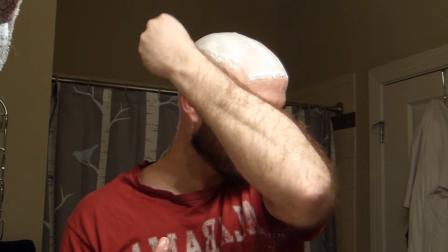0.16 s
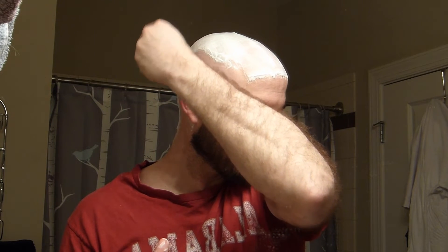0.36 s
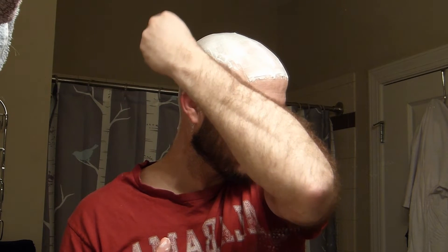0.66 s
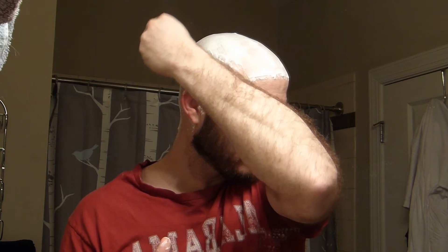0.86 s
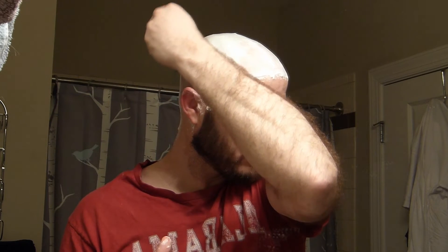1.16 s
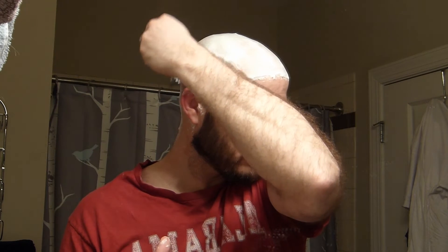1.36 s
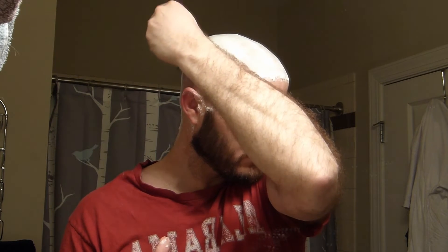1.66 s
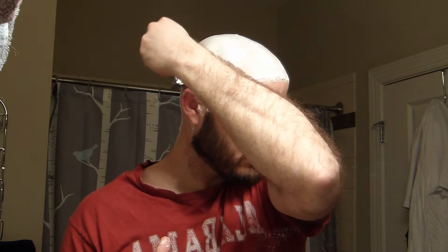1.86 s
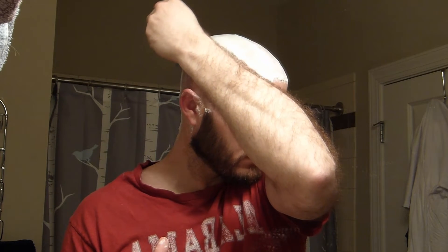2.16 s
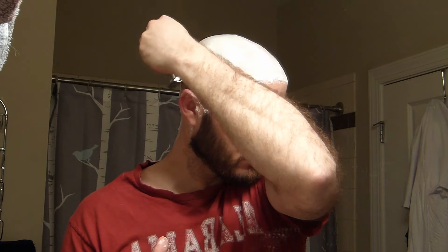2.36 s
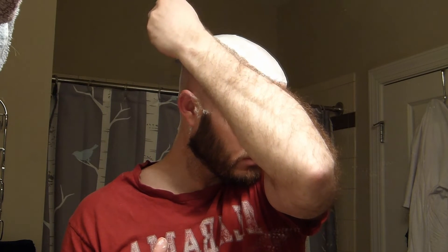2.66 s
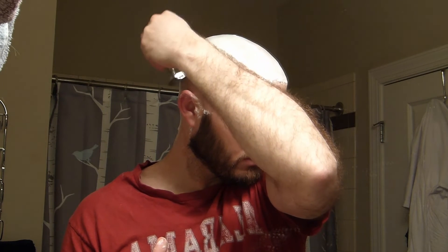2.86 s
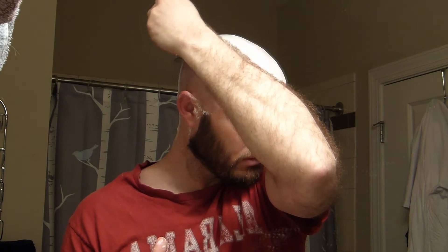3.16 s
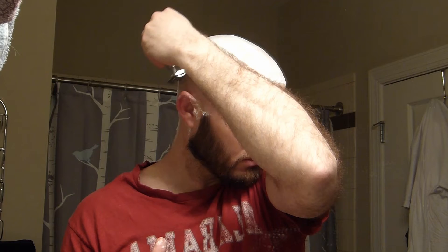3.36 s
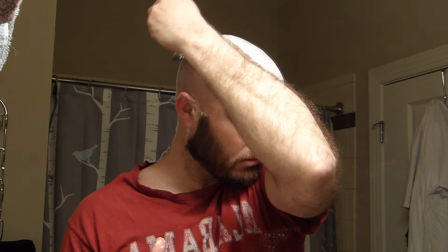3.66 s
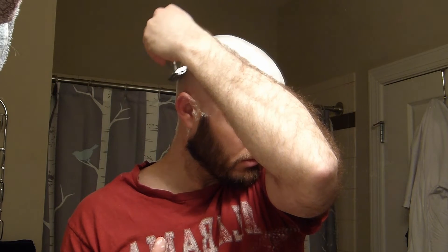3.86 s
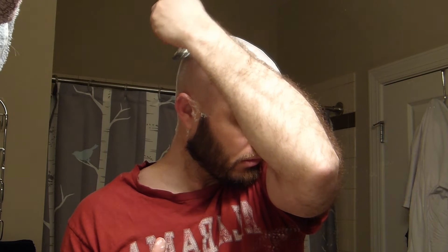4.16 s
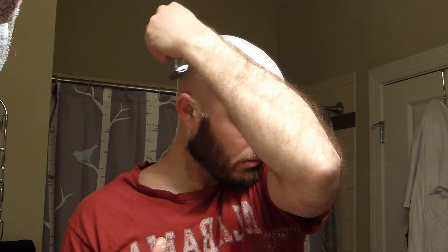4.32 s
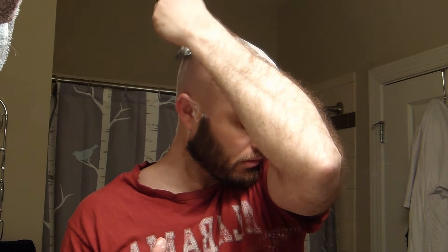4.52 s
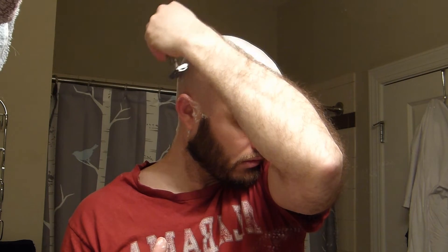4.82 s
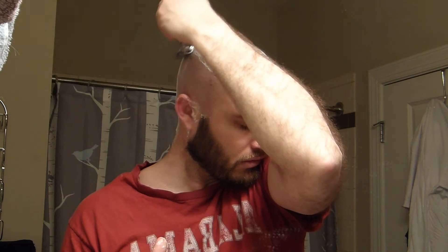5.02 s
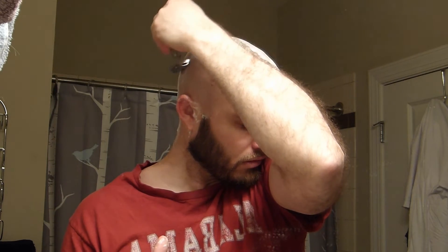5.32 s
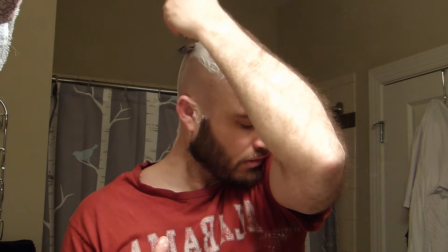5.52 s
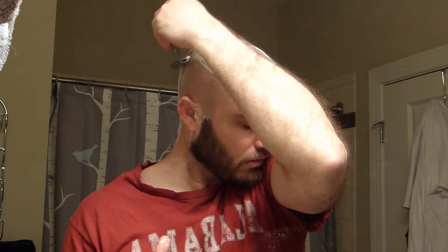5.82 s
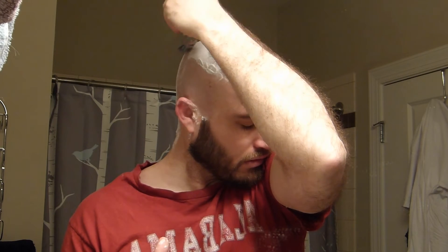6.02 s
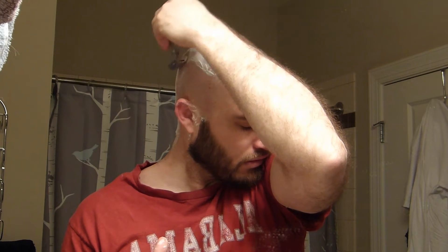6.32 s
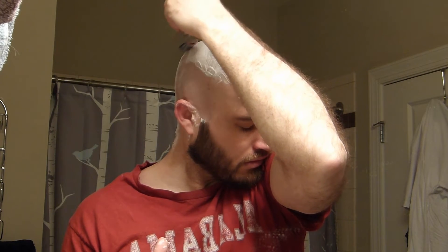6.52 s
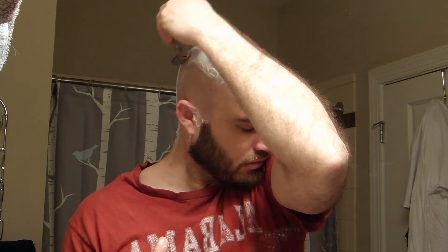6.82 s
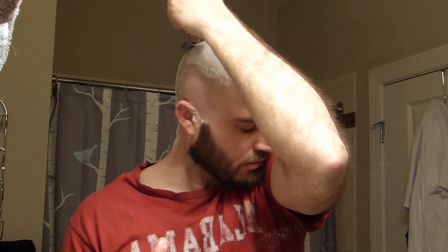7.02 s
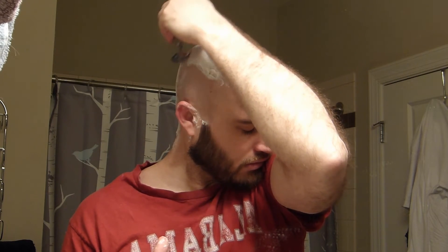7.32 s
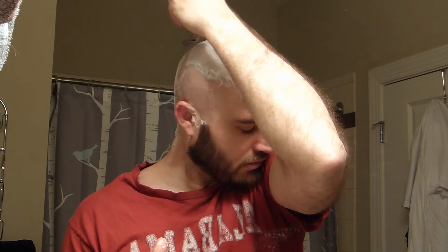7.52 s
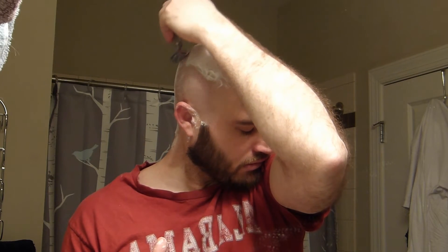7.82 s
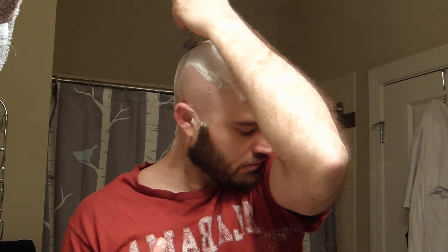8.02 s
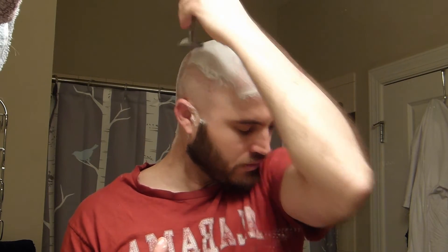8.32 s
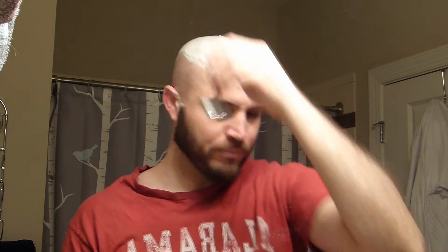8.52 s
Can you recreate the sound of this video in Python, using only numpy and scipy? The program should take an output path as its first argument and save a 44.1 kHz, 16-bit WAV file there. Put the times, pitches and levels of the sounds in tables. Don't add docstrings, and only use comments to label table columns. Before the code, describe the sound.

A small quiet bathroom, heard close in stereo, with steady low house rumble and faint hiss underneath. From 0 to about 1 s, razor strokes come in two uneven pairs, with bright, papery rasps of around a quarter second and little ticks. From 1.1 s they settle into an even rhythm, one roughly every half second, each landing, swelling to a crisp peak and stopping, often followed by a tiny scuff as the blade lifts. Stiff hairs snap and lather pops at scattered moments; a faint skin hum lies under each stroke, growing slightly later on. Dull floor board creaks come faintly at 0.6 to 0.7 s and 1.4 to 2.1 s. Hard surfaces give a brief, tight room reflection. The last scrapes, softer and overlapping, end near 8.15 s. A barely audible slide follows, then from 8.5 s a soft cloth rustle and a cluster of low creaks to the end.

```python
import sys
import numpy as np
from scipy import signal
from scipy.fft import rfft, irfft, next_fast_len
from scipy.io import wavfile
from scipy.ndimage import uniform_filter1d, map_coordinates

SR = 44100
rng = np.random.default_rng(int(sys.argv[2]) if len(sys.argv) > 2 else 0)


def put_to_file(sound):
    columns = np.atleast_2d(sound).T
    safe = np.clip(columns, -1, 1)
    whole_steps = np.round(safe * 32767)
    wavfile.write(sys.argv[1], SR, whole_steps.astype(np.int16))


def rack_gain(trim_db):
    fader = np.asarray(trim_db, float)
    return 10 ** (fader / 20)


N = 382773

# [t/s, level/dB]
HOUSE_LEVEL = [
    (0.0, -69.5),
    (0.71, -63.5),
    (1.18, -68),
    (1.5, -64),
    (2.17, -68),
    (3.54, -65),
    (3.83, -66.5),
    (5.25, -63.5),
    (5.73, -66.5),
    (8.3, -66),
]
# [f/Hz, density/dB per Hz]
RUMBLE_SPECTRUM = [(15, -58.5), (25, -33), (54, -4), (81, -9), (108, 4), (123, -1), (141, -8.5),
                   (167, -9.5), (200, -4.5), (226, -7), (279, -2.5), (406, -6.5), (442, -7), (480, -12),
                   (700, -12.5), (910, -68.5), (1540, -120)]
# [f/Hz, correlation/0-1]
RUMBLE_LIKENESS = [(30, 0.5), (60, 1), (200, 0.53), (400, 0.63), (700, 0.08)]
# [t/s, peak/dB, fizz/0-1]
LATHER_POPS = [(.0623, -35.5, .4), (.099, -33, 0.12), (.3823, -36.5, .5), (.389, -32, 0.3),
               (.6112, -33.5, 0.46), (.8472, -33.5, 0.01), (.8569, -28.5, 0.19), (.89, -30.5, 0.49),
               (1.336, -36.5, 0.37), (1.5267, -37.5, 0.16), (1.5351, -39, 0.03), (1.9708, -41, 0.31),
               (2.24, -24.5, 0.08), (2.5013, -35, .2), (2.5318, -41.5, .1), (3.2566, -22.5, 0.26),
               (3.449, -43.5, 0.58), (3.7133, -23, 0.01), (3.943, -30.5, 0.2), (4.2262, -25, 0.51),
               (5.3813, -39, 0.48), (5.922, -28, .05), (6.394, -23.5, 0.27), (6.7166, -33.5, 0.44),
               (6.861, -32.5, 0.36), (6.8691, -30.5, 0.31), (6.8859, -38.5, .02), (7.3502, -32.5, .07),
               (7.811, -42.5, 0.28), (7.8173, -33.5, 0.11)]
# [t/s, peak/dB]
STIFF_HAIRS = [(0.1116, -31.5), (0.1521, -30), (0.3297, -23), (0.3421, -27), (0.6353, -41.5), (.6417, -38),
               (.652, -40.5), (1.2822, -25), (1.792, -29.5), (1.7528, -22.5), (2.558, -27), (2.5719, -23.5),
               (3.466, -41), (3.493, -31), (3.97, -28.5), (3.985, -30.5), (4.452, -41), (4.5099, -38.5),
               (4.9968, -25.5), (5.223, -23.5), (5.6725, -29), (5.7204, -33.5), (6.4337, -27.5),
               (6.8737, -38), (6.9274, -26), (6.9483, -22), (6.9602, -24), (7.387, -25.5), (7.856, -34.5),
               (7.869, -29)]
# [landing t/s, fastest t/s, stop t/s, cutting level/dB]
STROKES = [(0.077, 0.162, 0.1933, -43.5), (0.165, 0.291, 0.3515, -33.5), (0.555, 0.643, 0.771, -49.5),
           (0.661, 0.771, 0.8282, -33.5), (1.099, 1.256, 1.295, -34.5), (1.557, 1.707, 1.7806, -36),
           (2.012, 2.129, 2.2685, -34.5), (2.52, 2.671, 2.766, -33.5), (3.002, 3.141, 3.262, -34.5),
           (3.46, 3.623, 3.717, -33.5), (3.947, 4.109, 4.21, -36.5), (4.454, 4.62, 4.697, -36.5),
           (4.926, 5.085, 5.238, -36.5), (5.451, 5.534, 5.671, -35), (5.933, 6.049, 6.162, -36),
           (6.431, 6.572, 6.646, -38), (6.898, 7.021, 7.126, -37.5), (7.353, 7.434, 7.574, -36.5),
           (7.851, 7.876, 8.148, -41.5), (7.855, 8.043, 8.169, -42)]
# [start t/s, fastest t/s, stop t/s, cutting level/dB]
SCUFFS = [(0.371, 0.393, 0.4059, -38.5), (0.865, 0.898, 0.9055, -47), (1.301, 1.34, 1.3513, -41.5),
          (1.774, 1.79, 1.808, -40), (2.218, 2.241, 2.2404, -34.5), (2.747, 2.766, 2.791, -42),
          (3.248, 3.255, 3.263, -44), (3.686, 3.708, 3.723, -36), (4.185, 4.229, 4.229, -40.5),
          (4.423, 4.463, 4.424, -47.5), (5.204, 5.224, 5.236, -38), (5.404, 5.466, 5.47, -48.5),
          (5.613, 5.719, 5.738, -50.5), (6.704, 6.713, 6.731, -48.5), (6.853, 6.861, 6.901, -50.5),
          (7.343, 7.349, 7.353, -46), (7.794, 7.817, 7.826, -50.5)]
# [start t/s, fastest t/s, stop t/s, cutting level/dB]
SLIDE_OFF = [
    (8.244, 8.343, 8.54, -62),
]
# [t/s, drag level/dB]
SKIN_BUNCHING = [(0.133, -55.5), (.32, -56), (.643, -58.5), (.8, -54.5), (1.191, -50), (1.647, -49.5),
                 (2.181, -48.5), (2.715, -50), (3.195, -50), (3.655, -50), (4.13, -49.5), (4.606, -47.5),
                 (5.115, -46), (5.616, -49), (6.1, -46.5), (6.605, -46), (7.067, -45.5), (7.499, -44),
                 (7.937, -51.5), (8.07, -46)]
# [landing loss/dB, stop loss/dB, curve exponent]
DRAG_LOSS = (17.23, 14.3, 1.0)
# [f/Hz, level/dB]
BLADE_RESPONSE = [(1000, -24), (2000, -15), (3500, -8.5), (4500, -5.5), (5500, -2), (7000, -2),
                  (9000, -0.5), (10500, -1), (11700, 1), (13000, -5.5), (13900, -3.5), (14500, -6.5),
                  (15000, -10.5), (15800, -27)]
# [f/Hz, level/dB]
CROWN_COLOUR = [(3500, 0.5), (5500, -1), (7500, 0), (10000, 0), (12000, 0), (14500, 1)]
# [f/Hz, width/Hz, level/dB]
SKIN_MODES = [(952, 352, -3.5), (1376, 545, -3.5), (1641, 222, 0.5), (2083.5, 134, -1.5), (3128, 1074, -7)]
# [t/s, peak/dB, f/Hz, overtone level/dB]
BOARD_SLIPS = [(0.611, -50.5, 309, -18.5), (0.74, -54, 288.4, -1.5), (1.438, -48, 212, -17),
               (1.473, -48, 219, -26.5), (1.557, -46.5, 212.2, -16.5), (1.639, -55, 485, -16),
               (1.692, -55.5, 490, -15), (2.015, -43, 214.6, -4.5), (2.059, -55.5, 191, -1),
               (2.099, -55, 488, -8.5), (8.319, -63, 306, -19.5), (8.432, -53.5, 339.2, -10.5),
               (8.464, -51.5, 299.3, -17.5), (8.492, -45, 315.4, -16), (8.519, -48, 316, -8.5),
               (8.558, -44, 300, -7.5), (8.584, -45, 274.4, -5.5), (8.599, -43, 393, -12),
               (8.614, -44, 277.7, -15.5), (8.644, -39, 304, -22), (8.669, -49, 350.2, -11.5)]
# [t/s, level/dB]
RUSTLE_LEVEL = [
    (8.3, -79.5),
    (8.44, -77),
    (8.498, -67.5),
    (8.63, -56.5),
    (8.68, -62.5),
]
# [f/Hz, density/dB per Hz]
RUSTLE_SPECTRUM = [(350, -35), (700, 0), (1300, -7.5), (2200, 2), (4700, -4.5), (7000, -13.5),
                   (12000, -9.5), (15000, -35.5)]
# [left t/s, left level/dB, right t/s, right level/dB]
NEAR_PATHS = [
    (0.00004, -1.5, 0.0, 0),
    (0.00073, -3, 0.00069, -10),
    (0.0022, -12, 0.0023, -11),
]
# [f/Hz, level/dB]
BODY_SHADE = [(2000, -0.74), (5000, -3.5), (9000, -2), (13000, 0.25)]
# [f/Hz, t60/s]
TILE_T60 = [(200, 0.79), (1500, 0.2014), (6000, 0.217), (14000, 0.0905)]
# [f/Hz, density/dB per Hz]
HISS_SPECTRUM = [(290, -26), (500, -2.5), (595, -6.5), (740, -3.5), (906, -5), (1840, -8), (3650, -9.5),
                 (8000, -10.5), (14500, -16.5), (16000, -27)]
# [f/Hz, level/dB]
SIDE_BOOST = [(100, -3.5), (1000, 4), (3000, 4.5), (6000, 1.5), (12000, -0.5)]
# [f/Hz, level/dB]
TOP_ROLLOFF = [(15200, 0), (15450, -11.5), (16200, -38.5)]


def unit(x):
    return x / np.sqrt(np.mean(x ** 2) + 1e-20)


def along(points, hz):
    f, v = np.transpose(points)
    return np.interp(np.log(hz + 1), np.log(f + 1), v)


def level_curve(rows):
    s, db = np.transpose(rows)
    return np.interp(np.arange(N) / SR, s, db)


def wobble(rate_hz):
    coarse = np.arange(0, N + 16, 16)
    knots = rng.standard_normal(N // 100)
    return np.interp(np.arange(N), coarse, map_coordinates(knots, [coarse * rate_hz / SR]))


def filtered(x, response):
    m = next_fast_len(N + SR // 2)
    return irfft(rfft(x, m) * response(np.fft.rfftfreq(m, 1 / SR)), m)[..., :N]


def resonances(modes):
    def response(f):
        total = 0
        for k, (hz, width_hz, db) in enumerate(modes):
            damping = 1j * f * width_hz
            total = total + (-1) ** k * rack_gain(db) * damping / (hz * hz - f * f + damping)
        return total
    return response


def grains(per_second, spread_db):
    when, size, sign = rng.random((3, N))
    snap = rack_gain(-spread_db * np.log(1.02 - size)) * np.sign(sign - 0.5)
    return unit((when < per_second / SR) * snap)


def patchy(x, depth_db, tall, long):
    z = signal.stft(x, nperseg=512)[2]
    field = uniform_filter1d(rng.standard_normal(z.shape[-2:]), tall, 0)
    field = uniform_filter1d(field, long, 1)
    return unit(signal.istft(z * rack_gain(depth_db * unit(field)), nperseg=512)[1][..., :N])


def house():
    noise = patchy(rng.standard_normal((2, N)), depth_db=3.5, tall=1, long=20)

    def mid_side(hz):
        angle = np.arccos(np.clip(along(RUMBLE_LIKENESS, hz), -1, 1)) / 2
        return rack_gain(along(RUMBLE_SPECTRUM, hz)) * [np.cos(angle), np.sin(angle)]
    mid, side = filtered(noise, mid_side)
    gain = rack_gain(level_curve(HOUSE_LEVEL) + 2.5 + 0.56 * wobble(6.2))
    return gain * unit(np.array([mid + side, mid - side])) * rack_gain([[-0.6], [0.6]])


def blade(x):
    crown_share = np.clip((np.arange(N) / SR - 2.5) / 1.15, 0, 1)
    temple = filtered(x * (1 - crown_share), lambda hz: 1j * rack_gain(along(BLADE_RESPONSE, hz)))
    crown = filtered(x * crown_share,
                     lambda hz: 1j * rack_gain(along(BLADE_RESPONSE, hz) + along(CROWN_COLOUR, hz)))
    return temple + crown


def lather():
    hair_fizz, thud_db, fizz_t60_s = 0.11, -27, 0.0099
    bright, dull, t = np.zeros(N + SR), np.zeros(N), np.arange(SR // 25) / SR
    for s, db, wet in list(LATHER_POPS) + [(s, db, hair_fizz) for s, db in STIFF_HAIRS]:
        tick = 0.51 * wet * rack_gain(-60 * t / fizz_t60_s) * rng.standard_normal(len(t))
        tick[0] = 1
        bright[round(s * SR):][:len(t)] += rack_gain(db + 9) * tick
        dull[round(s * SR)] = rack_gain(db + thud_db - 7.5)
    return blade(bright[:N]) + filtered(dull, resonances([(3200, 2200, 0)]))


def sweep(start, peak, stop, db, rise_db, fall_db, bend):
    contact_s = 0.0329
    t = np.arange(0, N, 32) / SR
    slow = np.clip(np.where(t < peak, (peak - t) / (peak - start), (t - peak) / (stop - peak)), 0, 1)
    press_s = min(contact_s, (stop - start) / 3)
    contact = np.clip(np.minimum(t - start, stop - t) / press_s, 0, 1)
    loss_db = np.where(t < peak, rise_db, fall_db) * slow ** bend
    return (rack_gain(db - loss_db) * contact) ** 2


def motion():
    passes = list(STROKES) + list(SCUFFS) + list(SLIDE_OFF)
    cut = sum(sweep(*row, rise_db=19.5, fall_db=16.5, bend=1.625) for row in passes)
    drag = sum(sweep(row[0], s, row[2], db, *DRAG_LOSS) for row, (s, db) in zip(STROKES, SKIN_BUNCHING))
    return [np.interp(np.arange(N) / 32, np.arange(len(p)), np.sqrt(p)) for p in (cut, drag)]


def razor():
    cut_gain, drag_gain = motion()
    clumps_db = 1.2 * wobble(40) + 2.2 * wobble(300)
    hairs = rack_gain(clumps_db) * grains(per_second=5000, spread_db=2.0)
    cutting = patchy(blade(hairs), depth_db=1.0, tall=6, long=10)
    slips = rack_gain(2.04 * wobble(60)) * grains(per_second=2500, spread_db=0.5)
    rub = filtered(slips, resonances(SKIN_MODES))
    drag = unit(filtered(rub, lambda hz: 1 / (1 + (800 / (hz + 1)) ** 4)))
    return rack_gain(-1.65) * cut_gain * cutting, rack_gain(-3.0) * drag_gain * drag


def boards():
    t60_s, attack_s = 0.0993, 0.0053
    out, t = np.zeros(N + SR), np.arange(SR // 8) / SR
    for s, db, hz, over_db in BOARD_SLIPS:
        over = rack_gain(over_db) * np.sin(2 * np.pi * rng.uniform(419, 563.4) * t)
        envelope = rack_gain(db + 3 - 60 * t / t60_s) * (1 - np.exp(-t / attack_s))
        out[round(s * SR):][:len(t)] += envelope * (np.sin(2 * np.pi * hz * t) + over)
    return out[:N]


def sleeve():
    level_db = level_curve([(0, -110), (8.15, -110)] + list(RUSTLE_LEVEL))
    fibres = grains(per_second=4000, spread_db=0.0)
    rustle = filtered(fibres, lambda hz: rack_gain(along(RUSTLE_SPECTRUM, hz)))
    return rack_gain(level_db + 6.0 + 1.23 * wobble(50)) * patchy(rustle, depth_db=4.0, tall=5, long=20)


def heard(x):
    def delayed(hz, s, db):
        return rack_gain(db) * np.exp(-2j * np.pi * hz * s)

    def capsules(hz):
        paths = sum(np.array([delayed(hz, *p[:2]), delayed(hz, *p[2:])]) for p in NEAR_PATHS)
        return paths * rack_gain(np.outer([0.5, -0.5], along(BODY_SHADE, hz)))
    return filtered(x, capsules)


def bathroom(x):
    out, size, delay = np.zeros((2, N + SR)), SR // 6, 90
    noise = rng.standard_normal((N // size + 1, 2, SR // 3))
    hz, t, z = signal.stft(noise, SR, nperseg=256)
    decay = rack_gain(-60 * t / along(TILE_T60, hz)[:, None])
    tails = signal.istft(z * decay, SR, nperseg=256)[1]
    for k, tail in enumerate(tails):
        block = x[None, k * size:(k + 1) * size]
        wet = signal.fftconvolve(block, tail / np.linalg.norm(tail[0]), axes=1)
        out[:, k * size + delay:][:, :wet.shape[1]] += wet
    return out[:, :N]


def scene():
    rumble = house()
    ticks = lather()
    cutting, drag = razor()
    head, floor, cloth = cutting + ticks, boards(), sleeve()
    near = heard(head + cloth) + heard(drag) * rack_gain([[-4.5], [1.2]]) + floor * rack_gain([[-0.8], [0.8]])
    room = bathroom(head + drag + rack_gain(-4.0) * (floor + cloth))
    return near + rack_gain([[-5.5], [-4.2]]) * room + rumble


def low_pass(x):
    return signal.sosfilt(signal.butter(12, 16500, fs=SR, output="sos"), x)


def record(dry):
    hiss_db, threshold_db = -64.5, -37.0
    hiss = unit(filtered(rng.standard_normal((2, N)), lambda hz: rack_gain(along(HISS_SPECTRUM, hz))))
    left, right = dry + rack_gain(hiss_db + 3.5) * hiss
    side = filtered(left - right, lambda hz: rack_gain(along(SIDE_BOOST, hz)))
    wide = np.array([left + right + side, left + right - side]) / 2
    wide = filtered(wide, lambda hz: rack_gain(along(TOP_ROLLOFF, hz)))
    power = uniform_filter1d(np.mean(wide ** 2, axis=0), size=2000)
    level_db = 10 * np.log10(np.abs(power) + 1e-12)
    lost = 1 - rack_gain(-3.5 * np.clip(level_db - threshold_db, 0, 5))
    starved = filtered(wide, lambda hz: ((hz > 560) & (hz < 900)) | (hz < 65))
    return low_pass(wide - lost * starved)


dry = scene()
out = record(dry)
put_to_file(out)
```